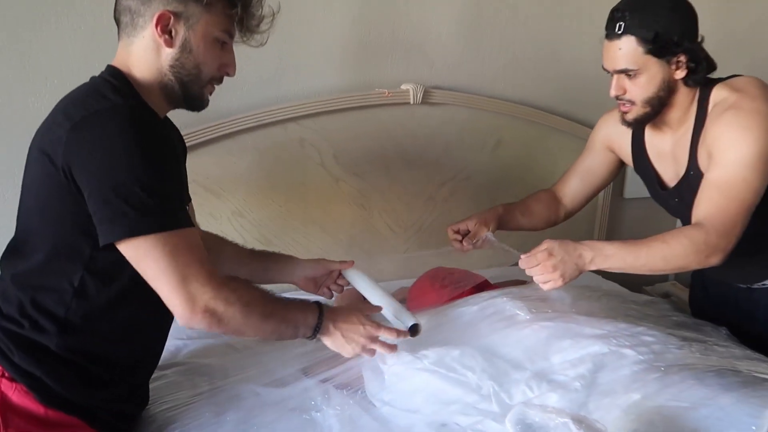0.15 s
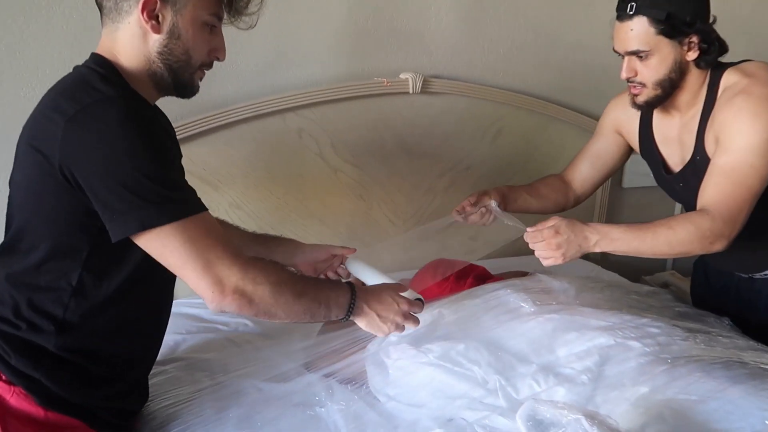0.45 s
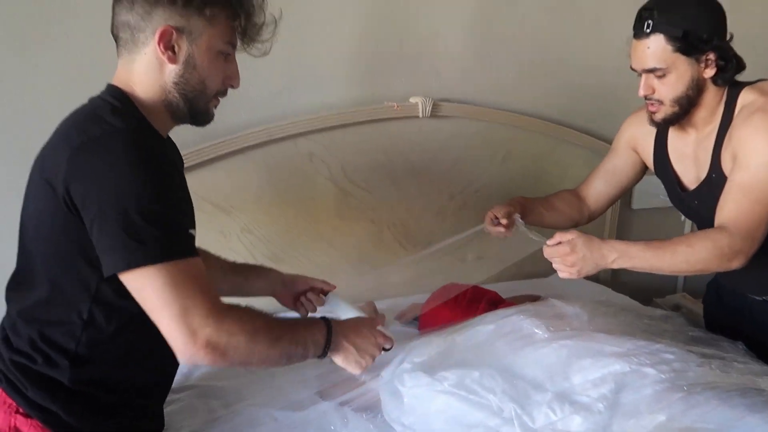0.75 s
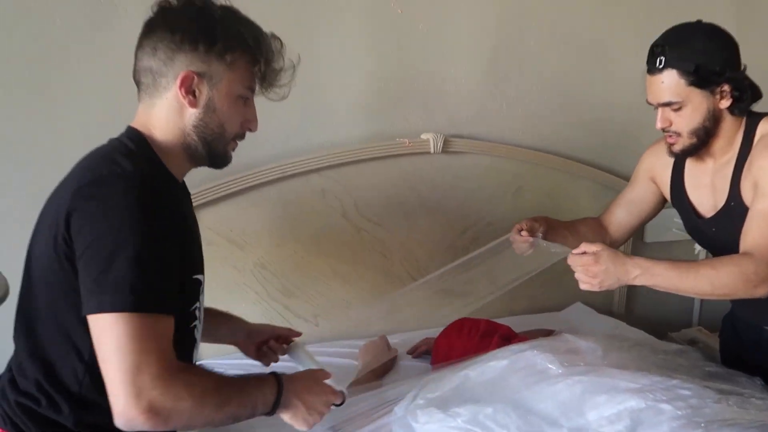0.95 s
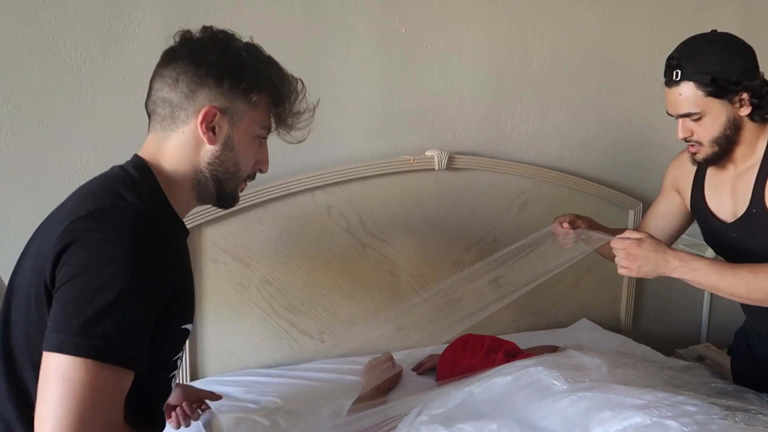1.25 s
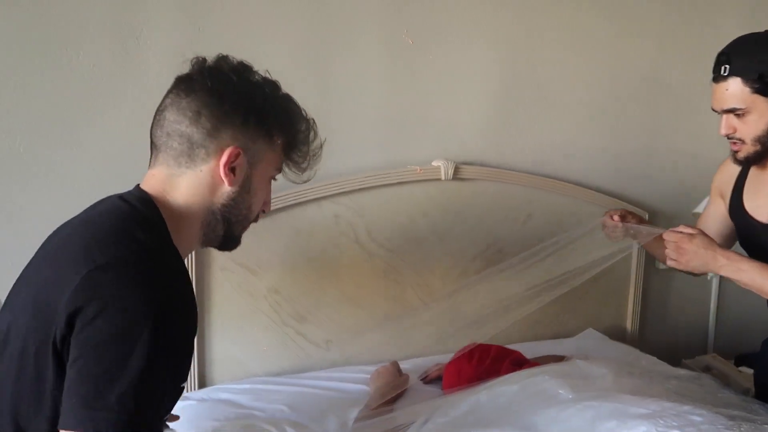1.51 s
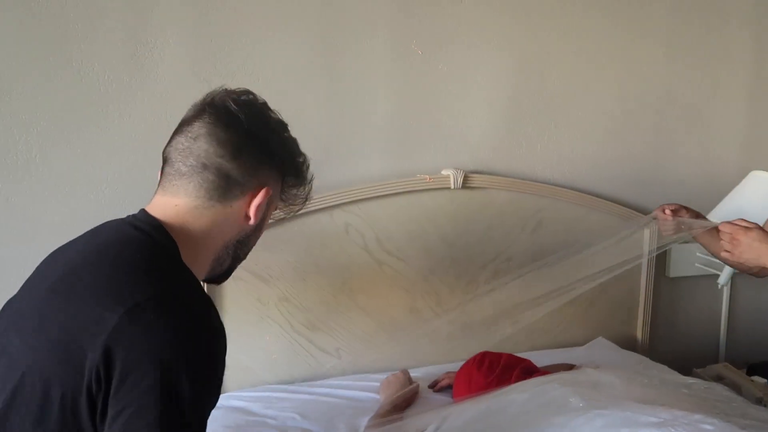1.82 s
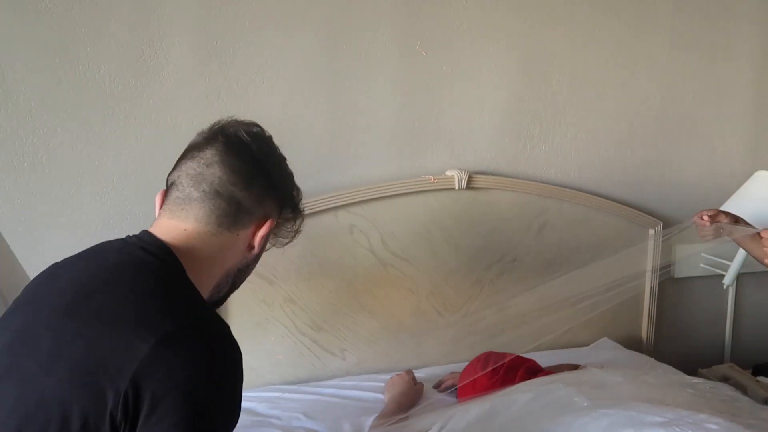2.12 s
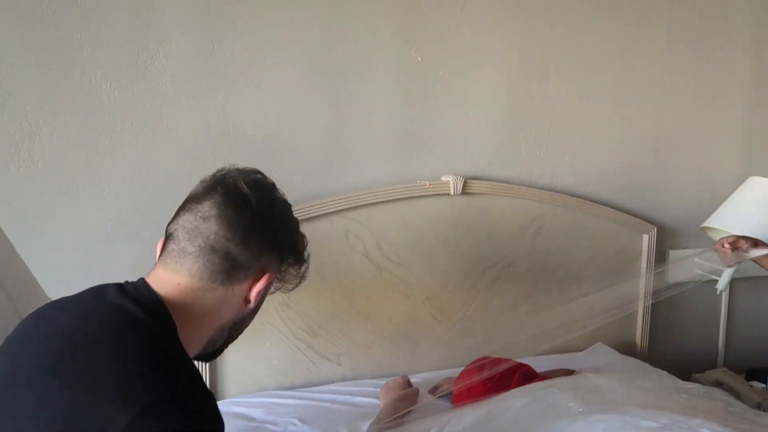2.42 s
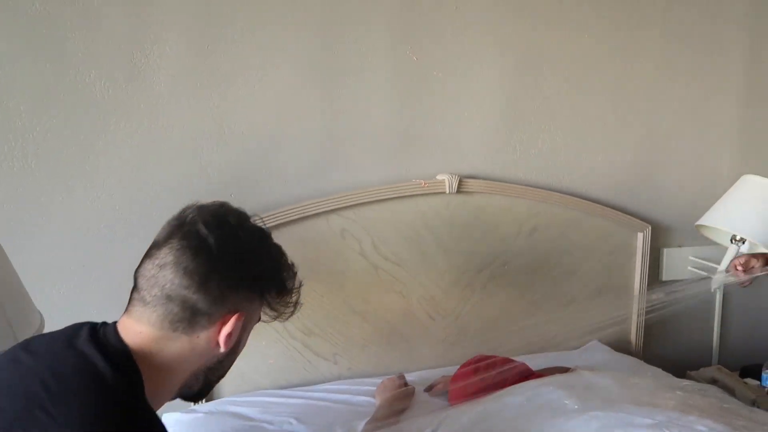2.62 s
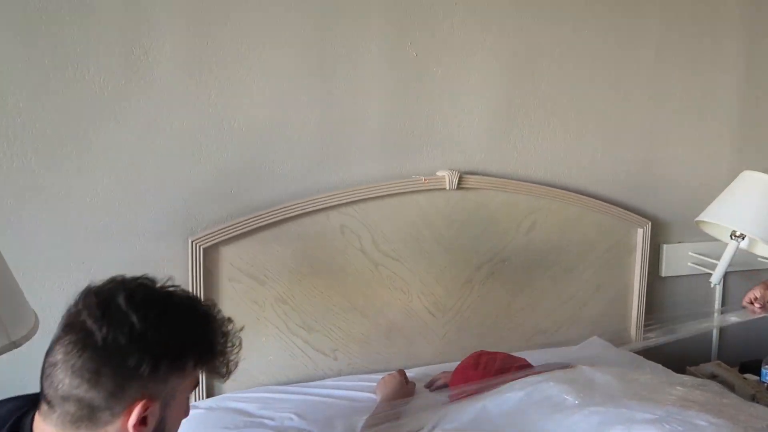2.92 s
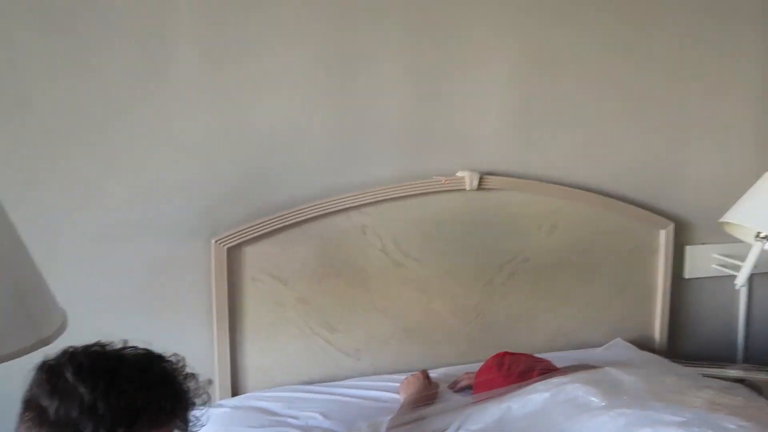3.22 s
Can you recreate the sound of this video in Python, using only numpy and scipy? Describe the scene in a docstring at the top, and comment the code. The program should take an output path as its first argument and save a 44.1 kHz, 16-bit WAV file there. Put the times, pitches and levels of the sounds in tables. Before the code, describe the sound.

Plastic wrap is drawn off a roll in a bedroom: faint rustle and a few early crackles, soft roll rubs midway, then denser crackling near the end, over a low motor hum.

```python
"""Plastic wrap is drawn off its roll across a bedroom. The peeling film rustles and hisses as many tiny random snaps,
and the sheet crackles in bursts, a few early and a longer run near the end.
The roll rubs as it turns, made from stick-slip grains through resonances, and knocks softly once.
A motor, probably an air conditioner, hums throughout: steady tones, a swelling drone and a rush of air."""
import sys
import numpy as np
from scipy import signal
from scipy.fft import rfft, irfft, next_fast_len
from scipy.io import wavfile
from scipy.ndimage import map_coordinates

SR = 44100
rng = np.random.default_rng(int(sys.argv[2]) if len(sys.argv) > 2 else 0)


def int16_out(signal):
    """Quantize to a 16-bit WAV file."""
    q = np.round(np.clip(np.atleast_2d(signal).T, -1, 1) * 32767)
    wavfile.write(sys.argv[1], SR, q.astype(np.int16))


N = 147735  # length in samples


def amp(db):
    """Turn decibels into a gain."""
    return 10 ** (np.asarray(db) / 20)


def unit(x):
    """Scale to an average (rms) level of 1."""
    return x / np.sqrt(np.mean(x ** 2) + 1e-20)


def along(points, hz):
    """Read a curve of (frequency, value) points on a log frequency axis."""
    f, value = np.transpose(points)
    return np.interp(np.log(hz + 1), np.log(f + 1), value)


def clock():
    """The time of each sample in seconds."""
    return np.arange(N) / SR


def curves(rows):
    """Draw each column after the time as a curve with one value per sample."""
    times, *columns = np.transpose(rows)
    return [np.interp(clock(), times, column) for column in columns]


def wobble(rate):
    """A smooth random curve with `rate` random points a second."""
    return map_coordinates(rng.standard_normal(1024), [clock() * rate], mode="wrap")


def filtered(x, response):
    """Multiply the spectrum of x by a response that depends on frequency."""
    size = next_fast_len(N + SR // 2)
    spectrum = rfft(x, size) * response(np.fft.rfftfreq(size, 1 / SR))
    return irfft(spectrum, size)[..., :N]


def coloured(x, spectrum):
    """Shape x with a (frequency, dB) curve, then bring it to rms 1."""
    return unit(filtered(x, lambda hz: amp(along(spectrum, hz))))


def stereo(pair, alike):
    """Blend two unrelated signals into left and right; the bass is nearly the same in both."""
    mono_below_hz = 234

    def mid_and_side(hz):
        turn = np.arccos(np.clip(along(alike, hz), -1, 1)) / 2
        apart = 1 - 1 / (1 + (hz / mono_below_hz) ** 4)
        return np.array([np.cos(turn), np.sin(turn) * apart])

    mid, side = filtered(pair, mid_and_side)
    return np.array([mid + side, mid - side])


def grains(rate, spread_db, smear):
    """Tiny random snaps of uneven size, `rate` a second, over a smooth noise of level `smear`."""
    happens = rng.random(N) < rate / SR
    size = happens * amp(spread_db * np.clip(rng.standard_normal(N), -2, 2))
    snaps = unit(size * rng.standard_normal((2, N)))
    return snaps + smear * rng.standard_normal((2, N))


def swell(crest_s, rise_s, decay_s):
    """An exponential build-up to a crest, then an exponential decay."""
    t = clock() - crest_s
    return np.exp(np.minimum(t / rise_s, -t / decay_s))


def burst(x, envelope):
    """x under an envelope, with the energy of that envelope."""
    return unit(x * envelope) * np.sqrt(np.mean(envelope ** 2))


def resonate(x, modes):
    """Pass x through (frequency, width, dB) resonances of alternating sign, then bring it to rms 1."""
    def response(f):
        total = 0
        for k, (centre, width, db) in enumerate(modes):
            damping = 1j * f * width
            total = total + (-1) ** k * amp(db) * damping / (centre ** 2 - f ** 2 + damping)
        return total

    return unit(filtered(x, response))


HUM_DRIFT = 0.49  # how far the phase of the hum wanders, radians


def tone(hz, db):
    """One hum line, a sine that wavers in level and phase."""
    phase = 2 * np.pi * (hz * clock() + rng.random()) + HUM_DRIFT * wobble(5)
    waver_db = 2 * wobble(5.23)
    return np.sqrt(2) * amp(db + waver_db) * np.sin(phase)


def motor():
    """Turning parts hum at multiples of the shaft rate, with a strong drone, over the rush of air."""
    shaft_hz = 28.5
    drone_hz, drone_gain_db = 114.1, 2.5
    air_db = -40.5
    # hum of the turning shaft: [multiple of the shaft rate, middle level/dB]
    shaft_lines = [(1, -88), (2, -54), (5, -46.5), (6, -52), (7, -51), (8, -55), (10, -51.5), (11, -52)]
    # further tones of the machine: [f/Hz, middle level/dB]
    machine_lines = [(324, -54), (368, -61.5), (444, -57.5), (493, -61), (736, -71)]
    # the strongest line swells and fades, in two lists: [t/s, level before the drone gain/dB]
    drone_swells = [
        [(0.0, -47), (0.034, -42.5), (0.332, -45), (0.35, -58), (0.566, -46), (0.604, -46), (0.678, -34),
         (0.706, -53), (0.774, -37), (0.834, -59), (0.872, -39), (1.1, -45), (1.138, -61), (1.188, -40),
         (1.27, -69)],
        [(1.28, -53), (1.33, -39), (1.82, -41), (1.86, -56), (1.9, -40.5), (2.05, -49.5), (2.25, -40),
         (2.29, -54), (2.34, -38), (2.79, -41), (2.85, -52), (2.97, -39.5), (3.05, -50), (3.29, -41.5),
         (3.35, -69)],
    ]
    # colour of the moving air: [f/Hz, relative level/dB]
    air_colour = [(20, -3), (30, -20), (42, -19), (60, -9), (90, 3), (125, -3.5), (170, -5), (260, -5),
                  (350, -8.5), (420, -12), (600, -13.5), (800, -19), (1200, -25), (2500, -30), (5000, -35),
                  (10000, -40.5), (12500, -43.5), (15000, -65)]
    # how alike left and right are in the air: [f/Hz, likeness from 0 to 1]
    air_alike = [(250, 0.94), (500, 0.82), (1000, 0.77), (2000, 0.18), (4000, 0.04), (9000, 0.027)]

    drone_db, = curves(np.vstack(drone_swells))
    drone_phase = 2 * np.pi * drone_hz * clock() + HUM_DRIFT * wobble(6.14)
    drone = np.sqrt(2) * amp(drone_db + drone_gain_db) * np.sin(drone_phase)
    hum = sum(tone(k * shaft_hz, db) for k, db in shaft_lines)
    hum = hum + sum(tone(hz, db) for hz, db in machine_lines)
    air = stereo(coloured(rng.standard_normal((2, N)), air_colour), air_alike)
    return hum + drone + amp(air_db) * air


def room(x):
    """The bedroom's short echo tail, one random tail blended slowly into the next; each frequency dies at its own speed."""
    # time for the tail to fall by 60 dB: [f/Hz, time/s]
    fade_times = [(200, 0.55), (2000, 0.21), (6000, 0.2), (14000, 0.29)]
    out = np.zeros((2, N))
    places = np.linspace(0, N / SR, 10)  # the time at which each random tail is strongest
    for s in places:
        hz, t, noise = signal.stft(rng.standard_normal((2, SR // 2)), SR, nperseg=256)
        fade = amp(-60 * t / along(fade_times, hz)[:, None])
        tail = signal.istft(noise * fade, SR, nperseg=256)[1]
        tail = tail / np.linalg.norm(tail[0])
        share = np.sqrt(np.maximum(1 - abs(clock() - s) / places[1], 0))
        out += signal.fftconvolve(x * share, tail, axes=1)[:, :N]
    return out


def roll():
    """The film sticks and slips on the turning roll, scraping and sounding its hollow core; one soft knock."""
    # rubs: [t at the crest/s, level/dB, build-up/s, decay/s, scrape level relative to the core/dB]
    rub_events = [(.98, -52.5, .05, .1, -14), (1.24, -53.5, .06, .04, 0), (1.59, -45, .028, .055, -15),
                  (1.645, -47.5, .01, .025, -7), (1.712, -41.5, .022, .05, -8),
                  (1.78, -49.5, .025, .035, -1), (2.24, -52, .039, .04, -7)]
    # resonances of the cardboard core: [f/Hz, width/Hz, relative level/dB]
    core_modes = [(356, 58, 2.5), (728, 166, 2.5), (900, 240, 0.5), (1320, 460, -4.5)]
    # resonances of film dragged over the roll: [f/Hz, width/Hz, relative level/dB]
    scrape_modes = [(1230, 450, 6), (1980, 1000, -2), (3340, 770, -7.5)]
    # resonances of the roll when knocked: [f/Hz, width/Hz, relative level/dB]
    knock_modes = [(500, 90, -6), (855, 110, 11), (1410, 460, -20)]
    knock_db = -42.5

    stutter_db = 2 * wobble(70)
    slips = grains(rate=1100, spread_db=4, smear=0.49) * amp(stutter_db)
    friction = filtered(slips, lambda f: 1 / (1 + (f / 3000) ** 2))  # softer treble
    core = resonate(friction, core_modes)
    scrape = resonate(slips, scrape_modes)
    out = np.zeros((2, N))
    for s, db, rise, decay, scrape_db in rub_events:
        out += amp(db) * burst(core + amp(scrape_db) * scrape, swell(s, rise, decay))
    knock = resonate(rng.standard_normal((2, N)), knock_modes)
    knock_shape = swell(crest_s=2.428, rise_s=.0025, decay_s=.014)
    return out + amp(knock_db) * burst(knock, knock_shape)


def crackles():
    """Each crackle is an avalanche of snaps that rings its own crease and shakes the taut sheet."""
    # crackles: [t at the crest/s, level of the bright snaps/dB, low body relative to it/dB,
    # build-up/s, decay/s, ring of the crease f/Hz, ring relative to the snaps/dB]
    crackle_events = [(.398, -51, -4, 0.0052, 0.0072, 3360, -6),
                      (.495, -49.5, -10, 0.0048, 0.0051, 4200, 4), (.569, -54, -12, .0036, .006, 7200, -4),
                      (.607, -51, -12, .002, .003, 8000, -2), (.618, -51.5, 0, .004, 0.014, 2950, 2),
                      (2.679, -51, 4, .003, 0.0091, 5440, -1.5), (2.733, -49.5, -3, .003, 0.0047, 8900, 2),
                      (2.77, -42, -3, 0.01, 0.0077, 1580, -3.5), (2.777, -48.5, 8, .003, .007, 690, 5),
                      (2.797, -62, -5, .005, .022, 1840, 14), (2.909, -51.5, 12.5, 0.0039, 0.0083, 4100, 2),
                      (2.92, -42.5, -3.5, 0.0033, 0.0061, 2090, -2), (2.951, -57, -5, .004, 0.01, 1880, 4),
                      (2.97, -42, 3, 0.0049, 0.0046, 2600, -5), (3.02, -41, -9, 0.0028, .004, 7800, -5),
                      (3.022, -55, -5, 0.0047, 0.0073, 2730, 7),
                      (3.078, -40.5, -2.5, 0.004, 0.0045, 9800, -4),
                      (3.085, -47, 0, 0.0027, 0.0052, 2480, -3), (3.13, -45, -5, .005, 0.0092, 5930, -5),
                      (3.203, -49, -16, .003, 0.0076, 7900, -10)]
    # colour of the bright snaps: [f/Hz, relative level/dB]
    snap_colour = [(200, -25), (900, -4), (2500, 1.5), (4000, -3), (6000, -0.5), (7500, -1), (9500, 0),
                   (12000, -6), (15000, -26)]
    # colour of the shaken sheet, the low body: [f/Hz, relative level/dB]
    sheet_colour = [(150, -7), (450, -2.5), (750, 7.5), (1300, 0.5), (1900, 0), (2800, -3), (5000, -5),
                    (15000, -31)]
    crease_q = 11.4  # sharpness of the ring

    def snaps():
        unevenness_db = -1 * wobble(350)
        return grains(rate=2000, spread_db=4, smear=0.78) * amp(unevenness_db)

    bright = coloured(snaps(), snap_colour)
    low = coloured(snaps(), sheet_colour)
    pluck = snaps()
    out = np.zeros((2, N))
    for s, db, body_db, rise, decay, hz, ring_db in crackle_events:
        envelope = swell(s, rise, decay)
        crease = signal.lfilter(*signal.iirpeak(hz, crease_q, SR), pluck)
        crackle = burst(bright, envelope)
        crackle = crackle + amp(body_db) * burst(low, envelope)
        crackle = crackle + amp(ring_db) * burst(crease, envelope)
        out += amp(db) * crackle
    return out


def peeling():
    """The clinging film lets go in dense tiny releases, heard as a rustle and a finer hiss."""
    # peeling and sliding: [t/s, rustle level before its gain/dB, hiss level before its gain/dB]
    peel_levels = [(0, -51.5, -61.5), (.09, -64, -59.5), (.15, -61, -77), (.29, -67, -76),
                   (.33, -57.5, -61), (.62, -58, -63), (.8, -63, -65.5), (1.08, -60.5, -64),
                   (1.24, -55, -63.5), (1.34, -61.5, -61.5), (1.45, -58.5, -69), (1.64, -66, -65),
                   (1.75, -56.5, -65), (1.86, -64, -79), (2.17, -67, -72), (2.24, -54.5, -68),
                   (2.5, -63, -77), (2.66, -61, -71), (2.85, -57, -60), (2.9, -53.5, -50.5),
                   (3.04, -58, -59), (3.2, -57, -56.5), (3.35, -55.5, -65.5)]
    # colour of the rustle: [f/Hz, relative level/dB]
    rustle_colour = [(150, -7), (600, -21), (1300, 13), (2600, 8.5), (4200, 3), (7000, -3), (15000, -45)]
    # colour of the hiss: [f/Hz, relative level/dB]
    hiss_colour = [(500, -31), (2500, 2), (4500, -0.5), (7000, -2.5), (10000, -2.5), (12500, -8),
                   (15000, -20)]
    rustle_gain_db, hiss_gain_db = -1.0, 3.5

    rustle_db, hiss_db = curves(peel_levels)
    flutter_db = 2.2 * wobble(25.83)
    rustle = coloured(grains(rate=900, spread_db=4.5, smear=1.0), rustle_colour)
    hiss = coloured(grains(rate=4000, spread_db=4.0, smear=0.21), hiss_colour)
    film = amp(rustle_db + rustle_gain_db) * rustle + amp(hiss_db + hiss_gain_db) * hiss
    return amp(flutter_db) * film


def scene():
    """Film and roll sound in the room, over the motor."""
    # how alike left and right are in the film sounds: [f/Hz, likeness from 0 to 1]
    film_alike = [(300, 1), (1000, 0.95), (2500, 1), (5000, 0.49), (8000, 0.29), (12000, 0)]
    room_db = -4.5
    film = peeling() + crackles() + roll()
    return stereo(film + amp(room_db) * room(film), film_alike) + motor()


def record(dry):
    """Cut everything from the top frequency upward."""
    top_hz = 15200
    return filtered(dry, lambda hz: hz < top_hz)


dry = scene()
out = record(dry)
int16_out(out)
```